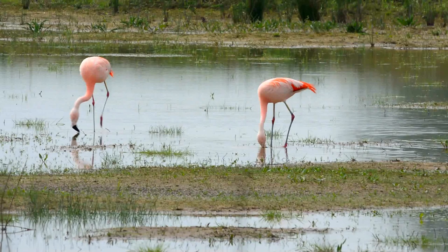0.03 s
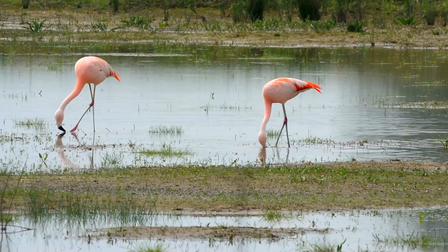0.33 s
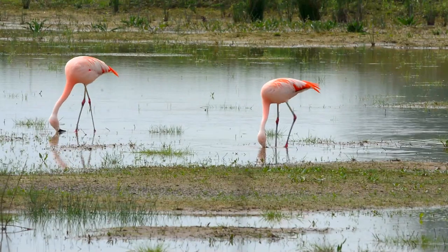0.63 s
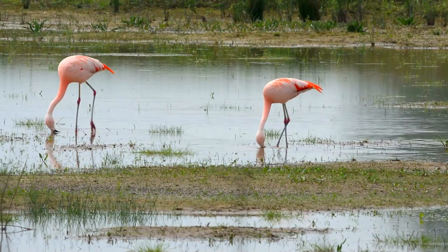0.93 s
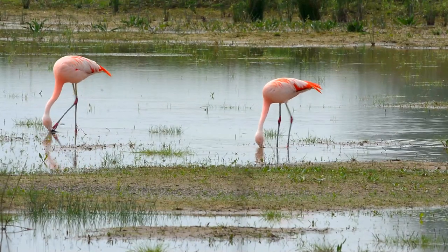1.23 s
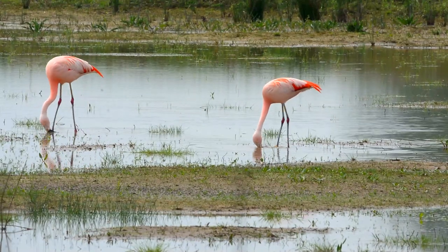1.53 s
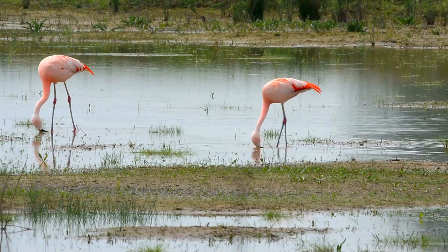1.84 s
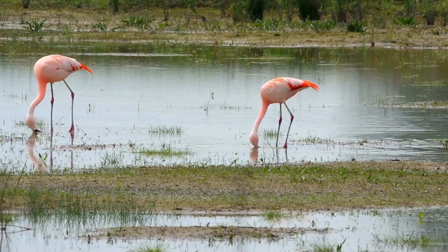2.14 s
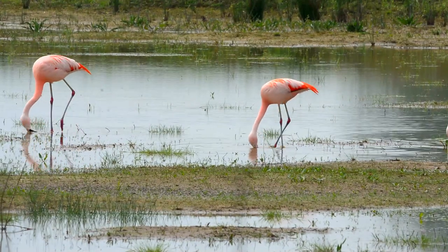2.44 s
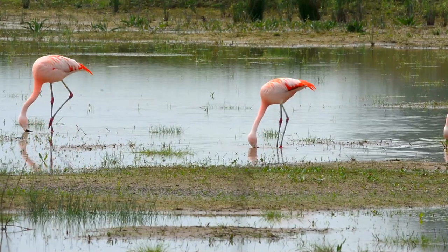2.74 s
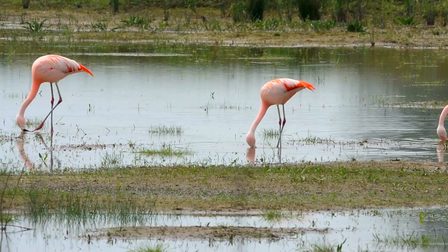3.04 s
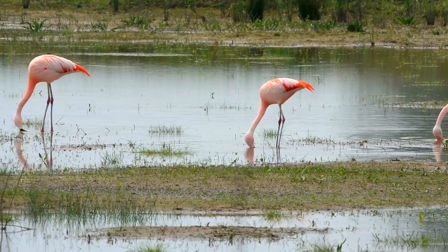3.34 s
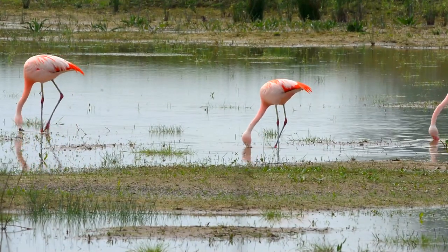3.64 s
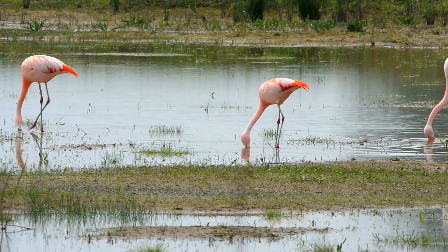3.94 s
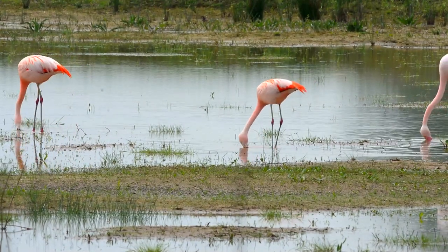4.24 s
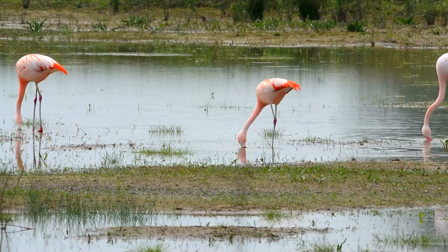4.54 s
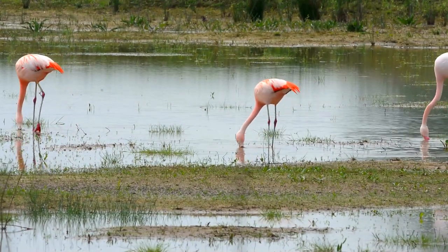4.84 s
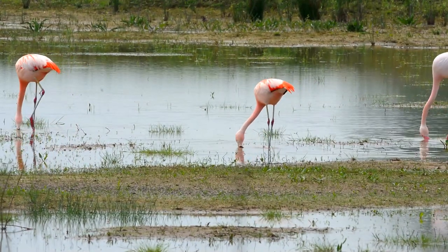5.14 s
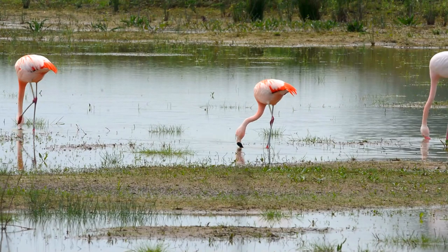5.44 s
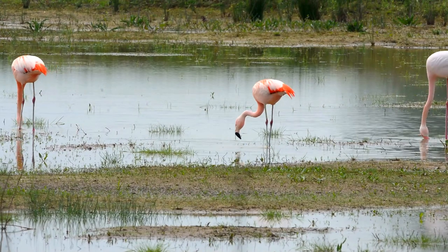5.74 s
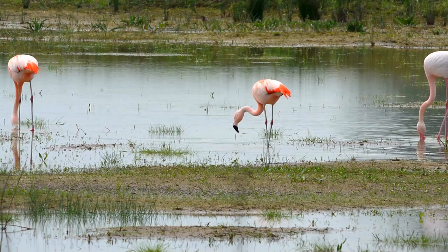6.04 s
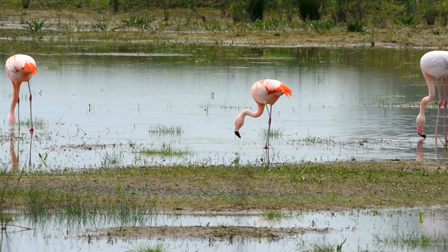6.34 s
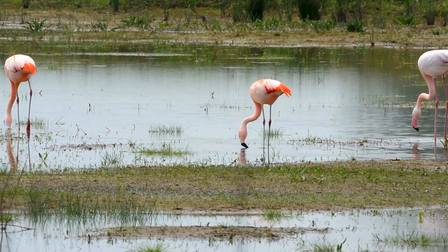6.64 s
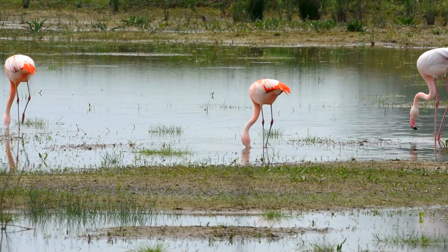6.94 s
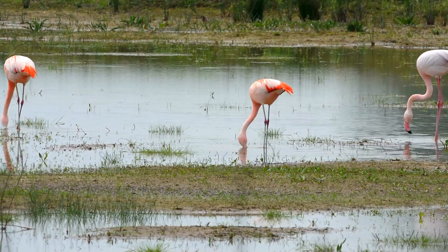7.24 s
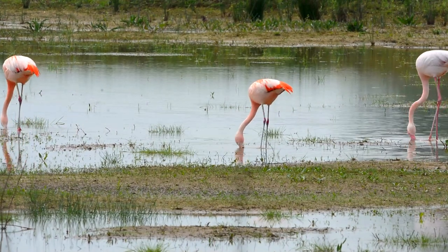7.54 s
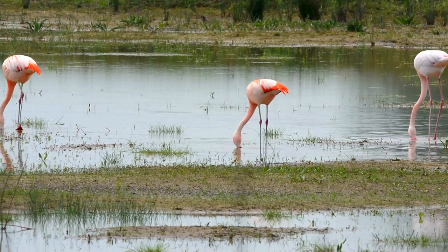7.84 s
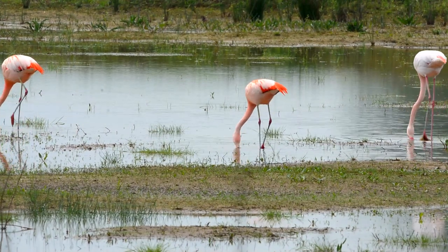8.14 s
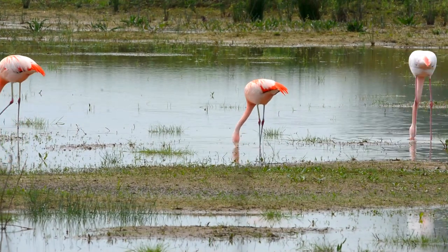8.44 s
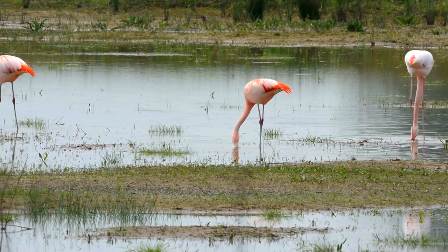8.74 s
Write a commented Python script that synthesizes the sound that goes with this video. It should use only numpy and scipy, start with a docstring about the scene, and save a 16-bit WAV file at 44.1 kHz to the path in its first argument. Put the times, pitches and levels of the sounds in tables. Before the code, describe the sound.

A small bird repeats a rising chirp while others twitter further off, over light wind, soft water plops and faint distant traffic.

```python
"""A small bird repeats a rising chirp, close by, over a shallow marsh pool in a light wind.
A second bird whistles trilled phrases and others twitter further off: all are gliding sine tones
that the bank answers faintly. Water plops as pockets of air ring. Gusts of noise rush in the trees,
hiss in the reeds and thump on the left microphone port, while far traffic drones underneath."""
import sys
import numpy as np
from scipy import signal
from scipy.fft import rfft, irfft, next_fast_len
from scipy.io import wavfile
from scipy.ndimage import uniform_filter1d

SR = 44100
rng = np.random.default_rng(int(sys.argv[2]) if len(sys.argv) > 2 else 0)


def unload_audio(sound):
    """Save the sound as a 16-bit wav file, at the path given as the first command line argument."""
    columns = np.transpose(np.atleast_2d(sound))
    # keep every value between -1 and 1, then stretch to whole-number steps
    steps = np.round(np.clip(columns, -1, 1) * 32767)
    wavfile.write(sys.argv[1], SR, steps.astype(np.int16))


N = 391608
TIME = np.arange(N) / SR

# The lead bird's calls. Each row: start and length in seconds, level in dB,
# then the sag of the first half and the break in the middle, both in dB against that level.
NEAR_CHIRPS = [(0.158, 0.06, -36, 0, -2), (.623, 0.065, -31.5, -3, -2), (1.093, 0.068, -32, 1.5, -10),
               (1.545, 0.069, -33, -1.5, 1.5), (1.998, 0.066, -32.5, -2.5, 1.5),
               (2.436, 0.065, -30, -4.5, 1), (2.897, 0.06, -33.5, -0.5, 1.5), (3.384, 0.063, -28, -4, -5.5),
               (3.975, 0.059, -31, -3.5, -4.5), (4.495, 0.06, -32.5, -4, 1.5),
               (4.994, 0.057, -33.5, -2.5, -3), (5.5, 0.055, -33.5, -1.5, -1),
               (6.081, .057, -31, -3.5, -4.5)]
def near_bird():
    """A tick, a rising chirp and a soft low note, about twice a second."""
    out = np.zeros(N)
    tick_lead_s, attack_s = .015, .00404
    for start, length, db, sag_db, break_db in NEAR_CHIRPS:
        tick = note(.009, 2210 * np.array([.93, 1, 1.07]), rise=.5, fall=.46)
        low_note = note(.028, (2063, 2027, 1940), rise=.15, fall=.35)
        add(out, start - tick_lead_s, undb(db - 11.5) * tick)
        add(out, start - attack_s / 2, undb(db) * chirp(length, sag_db, break_db, attack_s))
        add(out, start + length, undb(db - 15.5) * low_note)
    out *= undb(wander(180))
    return place(out, pan_db=2.5) + bank_echo(out, wet_db=-13, t60=.57, build_s=.015)


def chirp(length, sag_db, break_db, attack_s, release_s=.0088):
    """A whistle that catches just after the start, climbs and levels off; longer ones climb higher."""
    start_hz, climb_hz_per_s = 2915, 4970
    t = np.arange(-attack_s / 2, length + release_s / 2, 1 / SR)
    progress = t / length
    hz = start_hz + climb_hz_per_s * length * ease(progress / .914)
    first_half = 1 - ease((progress - .46) / .11)
    catch_db = -18 * bump(t, .0062, .0025)
    effort_db = sag_db * first_half + break_db * bump(progress, .57, .15) + catch_db
    envelope = ease((t - t[0]) / attack_s) * ease((t[-1] - t) / release_s)
    return tone(hz) * undb(effort_db) * envelope


# The second bird's tune. Each row: start and length in seconds, opening, middle and closing pitch
# in Hz, level in dB, trill depth and trill rate in Hz.
WHISTLED_NOTES = [(.54, 0.14, 2094, 2155, 2046, -47, 1, 2), (0.706, 0.14, 2180, 2274, 2320, -42.5, 205, 75),
                  (0.833, 0.097, 2620, 2764, 2700, -41, -1, 0), (1.0, 0.053, 2130, 2190, 2130, -42, 0, 0),
                  (1.038, 0.078, 2190, 2105, 1940, -40.5, 200, 36.5),
                  (1.104, .073, 1887, 1946, 1970, -38.5, 0, 0), (1.305, 0.15, 2130, 2186, 2050, -43, 0, -1),
                  (1.453, .165, 2520, 2440, 2320, -42, 228, 79), (1.7, 0.05, 2160, 2194, 2260, -43, 0, 0),
                  (1.735, 0.0694, 2155, 2090, 1860, -40, 222, 36),
                  (1.793, 0.08, 1960, 1906, 1855, -38.5, 0, 0)]
def whistler():
    """Two mellow phrases of held notes, fast trills and slower warbles; trills are the least steady."""
    out = np.zeros(N)
    for start, length, hz0, hz1, hz2, db, depth_hz, rate_hz in WHISTLED_NOTES:
        waver = .004 + .3 * depth_hz / hz1
        whistle = note(length, (hz0, hz1, hz2), depth_hz, rate_hz, waver, rise=.25, fall=.12)
        add(out, start, undb(db) * whistle)
    out *= undb(1.4 * wander(90))
    return place(out, pan_db=4.5) + bank_echo(out, wet_db=-9, t60=.42, build_s=.012)


# Held whistles that sag a little. Each row: start and length in seconds, pitch in Hz, level in dB.
FAR_HELD_NOTES = [(0.546, .048, 4440, -52.5), (2.46, 0.073, 4050, -50), (3.42, 0.16, 1800, -52),
                  (3.46, 0.076, 3510, -47.5), (3.639, 0.069, 3430, -46), (3.746, 0.11, 2097, -48),
                  (4.428, 0.062, 3460, -42), (4.76, 0.065, 3620, -42), (5.621, .071, 3260, -49.5),
                  (5.822, .14, 3305, -47), (6.89, .17, 1500, -53.5), (7.03, .13, 3830, -57.5)]
# Even glides. Each row: start and length in seconds, opening and closing pitch in Hz, level in dB.
FAR_SLURS = [(.86, 0.05, 5750, 4600, -52), (.995, .05, 5900, 4400, -55), (1.526, .04, 5650, 5150, -52.5),
             (2.313, 0.049, 4880, 3500, -48), (2.94, .028, 4700, 4050, -54), (3.575, .021, 3950, 3550, -49),
             (4.12, .025, 3520, 3040, -47), (4.711, 0.06, 4080, 3410, -42.5),
             (4.897, .053, 3840, 3590, -40), (5.115, 0.055, 4480, 3680, -45),
             (5.278, 0.063, 3430, 3840, -43), (5.334, 0.087, 3750, 3280, -44),
             (6.864, .025, 3700, 3050, -53), (7.81, .03, 3000, 2600, -52), (7.894, .027, 2550, 3200, -53),
             (8.309, .025, 3650, 2450, -49), (8.446, .022, 3490, 2480, -50), (8.602, .022, 3420, 2480, -50),
             (8.852, .028, 2500, 3130, -49)]
# Short arched pips. Each row: start in seconds, top pitch in Hz, level in dB.
FAR_PIPS = [(1.625, 3980, -52), (4.197, 3060, -47), (4.302, 2970, -48), (4.98, 3390, -40.5),
            (7.278, 3480, -54)]
def far_birds(faint_count=22, faint_until_s=5.6):
    """Held notes, slurs and pips among faint random calls, all fluttering from crossing moving air."""
    out = np.zeros(N)
    for start, length, hz, db in FAR_HELD_NOTES:
        add(out, start, far_call(length, (hz, hz, hz * .975), db))
    for start, length, hz0, hz1, db in FAR_SLURS:
        add(out, start, far_call(length, (hz0, np.sqrt(hz0 * hz1), hz1), db))
    for start, hz, db in FAR_PIPS:
        foot_hz = hz * .883
        add(out, start, far_call(.035, (foot_hz, hz, foot_hz), db))
    for k, (when, height, glide, size) in enumerate(rng.random((faint_count, 4))):
        start = (k + when) / faint_count * faint_until_s
        octaves = .5 * (height - .5) + .153 * (glide - .3) * np.array([1, 0, -1])
        add(out, start, far_call(.0494 * (.5 + size), 3960 * 2 ** octaves, db=-55 - 4 * height))
    out *= undb(2 * wander(140))
    return place(out, pan_db=.5) + bank_echo(out, wet_db=-8.5, t60=.53, build_s=.0056)


def far_call(length, pitches, db):
    """One distant note; the higher it lies and the wider it glides, the raspier it is."""
    rasp = .045 * np.ptp(pitches) / pitches[1] * (pitches[1] / 4000) ** 3
    return undb(db) * note(length, pitches, waver=.004 + rasp, rise=.19, fall=.091)


# Bouts of blurred twitter from the far bank.
# Each row: start and length in seconds, centre pitch in Hz, top level of one slur in dB.
TWITTER_BOUTS = [(.89, 0.16, 3910, -48.5), (1.614, .14, 3630, -52.5), (2.325, .13, 3640, -49.5),
                 (2.55, .19, 4050, -52.5), (2.972, 0.12, 3760, -52.5), (3.469, 0.19, 3540, -47),
                 (4.768, 0.11, 3660, -52), (5.548, 0.18, 3350, -48), (6.35, .2, 3600, -51),
                 (6.851, .14, 3046, -50.5), (7.199, .12, 3660, -50.5), (7.327, 0.12, 2770, -51.5),
                 (7.661, .3, 3770, -52.5), (8.451, 0.18, 3390, -52)]
def twitter(slurs_per_bout=14, pitch_spread=.17):
    """Each bout is a scatter of tiny slurs, smeared by a strong, short echo."""
    out = np.zeros(N)
    for start, length, hz, db in TWITTER_BOUTS:
        for when, size, *turns in rng.random((slurs_per_bout, 5)):
            pitches = hz * (1 + pitch_spread * (2 * np.array(turns) - 1))
            slur = note(.0191, pitches, waver=.015, rise=.36, fall=.31)
            add(out, start + when * length - .01, undb(db - 8.2 * (1 - size)) * slur)
    return place(out, pan_db=2) + bank_echo(out, wet_db=-5, t60=.18, build_s=.009)


# Clear plops in the shallows. Each row: start in seconds, pitch in Hz, level in dB.
CLEAR_PLOPS = [(1.102, 760, -25), (1.198, 630, -34), (1.474, 690, -31), (1.579, 695, -32.5),
               (1.688, 705, -30.5), (2.056, 825, -29), (5.454, 540, -33), (5.737, 560, -35),
               (5.870, 620, -29), (6.104, 560, -35), (6.261, 950, -29), (6.395, 450, -36),
               (6.52, 1230, -36)]
def water(wind_db, lap_count=240):
    """A few clear plops, one slosh, and small laps that crowd into the gusts."""
    out = np.zeros(N)
    for start, hz, db in CLEAR_PLOPS:
        add(out, start, undb(db) * plop(hz, cycles=1.23, splash=.68))
    slosh_start, slosh_s, slosh_db = 4.29, .14, -47
    for when, pitch in rng.random((12, 2)):
        low_plop = plop(190 + 230 * pitch, cycles=1.4, splash=.56)
        add(out, slosh_start + when * slosh_s, undb(slosh_db) * low_plop)
    lap_odds = np.cumsum(undb(3.5 * (wind_db - wind_db.max())))  # climbs fastest in the gusts
    for when, pitch, size in rng.random((lap_count, 3)):
        i = np.searchsorted(lap_odds, when * lap_odds[-1])
        lap = plop(450 * 3.2 ** pitch, cycles=1.5, splash=.7)
        add(out, i / SR, undb(wind_db[i] - 5.5 + 14.4 * size ** 2) * lap)
    return place(out, pan_db=.5)


def plop(hz, cycles, splash):
    """A pocket of air rings for a few cycles, rising in pitch, under a tiny splash of noise."""
    t = np.arange(SR // 32) / SR
    ring = tone(hz * (1 + 12 * t)) * np.exp(-t * hz / cycles)
    froth = np.interp(t * hz, np.arange(64), rng.standard_normal(64))
    spray = froth * np.cos(2 * np.pi * 1.3 * hz * t) * np.exp(-t / .0033)
    attack = 1 - np.exp(-t / .00045)
    return (ring + splash * spray) * attack


# Gusts that swell and die away.
# Each row: peak time and half width in seconds, level in the trees and in the reeds in dB.
GUST_SWELLS = [(1.3, .6, -51.5, -58), (1.35, .07, -60, -55), (1.54, .03, -60, -57), (2.02, .13, -59, -61),
               (5.75, .5, -51, -56.5), (6.35, .17, -57, -57.5), (7.05, .2, -64, -62.5),
               (7.72, .25, -64, -60), (7.85, 0.0343, -64, -57)]
def breeze(trees_db=-52.5, reeds_db=-60, reeds_drop_db_per_s=.2):
    """Level curves in dB for trees and reeds: gusts add their power to a light breeze."""
    trees_power = undb(trees_db) ** 2
    reeds_power = undb(reeds_db - reeds_drop_db_per_s * (TIME - TIME.mean())) ** 2
    for peak, width, trees_gust_db, reeds_gust_db in GUST_SWELLS:
        swell = bump(TIME, peak, width)
        trees_power += swell * undb(trees_gust_db) ** 2
        reeds_power += swell * undb(reeds_gust_db) ** 2
    return 10 * np.log10(trees_power), 10 * np.log10(reeds_power)


# The tone of wind in the trees. Each row: frequency in Hz, relative level in dB.
TREE_SPECTRUM = [(150, -24.5), (260, -9), (380, -4.5), (600, -2), (900, 0), (1300, -1.5), (2000, -4),
                 (2700, -9.5), (3500, -8), (4600, -17), (7000, -28.5), (15000, -57)]
# The stereo image of far trees and traffic. Each row: frequency in Hz, left-right correlation.
FAR_LIKENESS = [(30, 0.9), (130, 0.99), (280, 0.73), (600, 0.89), (2000, 0.87), (4000, 0.61), (15000, 0.33)]
def tree_rush(wind_db):
    """Wind in the far trees: a broad rush that swells straight ahead while the sides hold steady."""
    noise = stereo_noise(TREE_SPECTRUM, FAR_LIKENESS, level_band_hz=(400, 1500))
    ahead = noise.mean(axis=0)
    sides = noise - ahead
    return place(ahead * undb(wind_db + .5 * wander(22)) + sides * undb(-50), pan_db=.5)


# The tone of wind in the reeds. Each row: frequency in Hz, relative level in dB.
REED_SPECTRUM = [(800, -18), (2500, 9), (4000, 4), (6000, 1.5), (9000, -0.5), (12000, -1.5), (15500, -2)]
def reed_hiss(reed_db):
    """Wind in the near reeds: a fine, flickering hiss that widens towards the top."""
    likeness = [(2000, .82), (12000, .18)]
    hiss = stereo_noise(REED_SPECTRUM, likeness, level_band_hz=(6500, 15000))
    return place(hiss * undb(reed_db + .73 * wander(45)), pan_db=.5)


# Soft thumps of wind. Each row: peak time in seconds, strength in dB.
WIND_THUMPS = [(1.42, -53), (1.852, -52), (3.384, -55), (5.773, -52), (6.06, -57), (6.33, -51), (8.38, -52)]
def buffets(thump_s=.12):
    """Eddies thump softly on the left microphone port and barely reach the right."""
    push = np.zeros(N)
    for middle, db in WIND_THUMPS:
        add(push, middle - thump_s / 2, undb(db) * np.hanning(int(thump_s * SR)))
    low_band = signal.butter(2, [48, 135], "band", fs=SR, output="sos")
    eddies = signal.sosfilt(low_band, rng.standard_normal(N))
    return push * eddies / eddies.std() * np.array([[.85], [.1]])


# Far engines. Each row: start and length in seconds, opening and closing pitch in Hz, level in dB.
ENGINE_DRONES = [(0.0492, 0.99, 112, 97, -57.5), (5.05, 0.75, 62, 73, -62.5), (6.9, 1.98, 190, 197, -64),
                 (2.9, 2.15, 420, 350, -68), (.8, 5.8, 139, 138, -69)]
# The tone of the traffic bed. Each row: frequency in Hz, relative level in dB.
TRAFFIC_SPECTRUM = [(20, -26), (35, -17), (50, -0.5), (68, 0.5), (90, -1), (115, 0), (140, 5), (165, -2.5),
                    (195, -1.5), (250, -13), (500, -38.5)]
def traffic():
    """A low rumble in which single engines stand out for a while."""
    engines = np.zeros(N)
    for start, length, hz0, hz1, db in ENGINE_DRONES:
        add(engines, start, undb(db) * note(length, (hz0, (hz0 + hz1) / 2, hz1), waver=.0797))
    rumble = stereo_noise(TRAFFIC_SPECTRUM, FAR_LIKENESS, level_band_hz=(40, 250))
    rumble *= undb(-60 + .31 * wander(4.5))
    engines *= undb(1.4 * wander(12))
    return place(rumble + engines, pan_db=.5)


def bank_echo(x, wet_db, t60, build_s):
    """Scattered echoes from the reeds and trees round the pool, partly different at each ear."""
    t = np.arange(SR // 2) / SR
    common, left, right = rng.standard_normal((3, len(t)))
    build_up = 1 - np.exp(-(t / build_s) ** 2)
    echo = (common + np.array([left, right]) / 2) * undb(-60 * t / t60) * build_up
    echo *= undb(wet_db) / np.sqrt(np.sum(echo ** 2) / 2)
    return signal.oaconvolve(np.float32(x[None]), np.float32(echo), axes=1)[:, :N]


def note(length, pitches, depth_hz=0, rate_hz=0, waver=0, rise=.1, fall=.15):
    """A sine arcs through three pitches, with trill and waver; rise and fall are shares of its length."""
    t = np.arange(int(length * SR)) / SR
    progress = t / length
    knots = np.arange(0, length, .003)
    unsteady = 1 + waver * np.interp(t, knots, rng.standard_normal(len(knots)))
    arc_hz = np.polyval(np.polyfit([0, .5, 1], pitches, 2), progress)
    trill_hz = depth_hz * np.sin(2 * np.pi * rate_hz * t)
    ramps = np.clip(np.minimum(progress / rise, (1 - progress) / fall), 0, 1)
    return tone((arc_hz + trill_hz) * unsteady) * np.sin(np.pi / 2 * ramps)


def tone(hz):
    """A sine that follows a pitch curve."""
    return np.sin(2 * np.pi * np.cumsum(hz) / SR)


def stereo_noise(spectrum, likeness, level_band_hz):
    """Noise of a given colour and width whose mid signal has rms 1 inside the level band."""
    size = next_fast_len(N)
    hz = np.arange(size // 2 + 1) * SR / size
    mid, side = rfft(rng.standard_normal((2, size))) * undb(read_curve(spectrum, hz))
    alike = np.clip(read_curve(likeness, hz), 0, .99)
    side *= np.sqrt((1 - alike) / (1 + alike))
    in_band = (hz > level_band_hz[0]) & (hz < level_band_hz[1])
    rms = irfft(mid * in_band, size).std()
    return irfft(np.array([mid + side, mid - side]), size)[:, :N] / rms


def read_curve(points, hz):
    """Read a table of (Hz, value) on a log-frequency axis."""
    point_hz, values = np.transpose(points)
    return np.interp(np.log(hz + 1), np.log(point_hz), values)


def wander(rate_hz):
    """Random steps, smoothed twice into a drift with a spread near 1."""
    hold = int(SR / rate_hz)
    steps = np.repeat(rng.standard_normal(N // hold + 1), hold)
    return 1.3 * uniform_filter1d(uniform_filter1d(steps, hold), hold)[:N]


def ease(u):
    """A smooth step from 0 to 1 as u goes from 0 to 1."""
    return np.sin(np.pi / 2 * np.clip(u, 0, 1)) ** 2


def bump(t, middle, width):
    """A bell-shaped swell of height 1."""
    return np.exp(-((t - middle) / width) ** 2)


def undb(db):
    """Decibels to gain."""
    return 10 ** (np.asarray(db) / 20)


def add(track, start, sound):
    """Mix a sound into a track at a time in seconds."""
    i = max(int(start * SR), 0)
    track[i:i + len(sound)] += sound[:max(N - i, 0)]


def place(x, pan_db):
    """Pan a sound so that the left is pan_db above the right."""
    return x * undb(np.array([[pan_db], [-pan_db]]) / 2)


def scene():
    """Birds over water, wind and far traffic."""
    wind_db, reed_db = breeze()
    birds = near_bird() + whistler() + far_birds() + twitter()
    return birds + water(wind_db) + tree_rush(wind_db) + reed_hiss(reed_db) + buffets() + traffic()


def record(dry):
    """The sound opens faintly, then fades in; the very top is cut steeply."""
    open_s, fade_from_s, fade_s, top_hz = .038, .14, .41, 15700
    faint = undb(-24.5) * ease((TIME - open_s) / .006 + .5)
    fade_in = faint + (1 - faint) * ease((TIME - fade_from_s) / fade_s)
    low_pass = signal.ellip(12, .1, 70, top_hz, fs=SR, output="sos")
    return signal.sosfilt(low_pass, dry * fade_in)


dry = scene()
out = record(dry)
unload_audio(out)
```